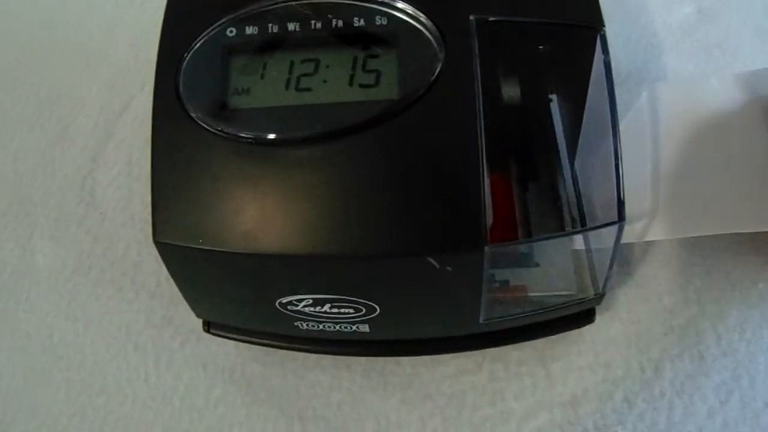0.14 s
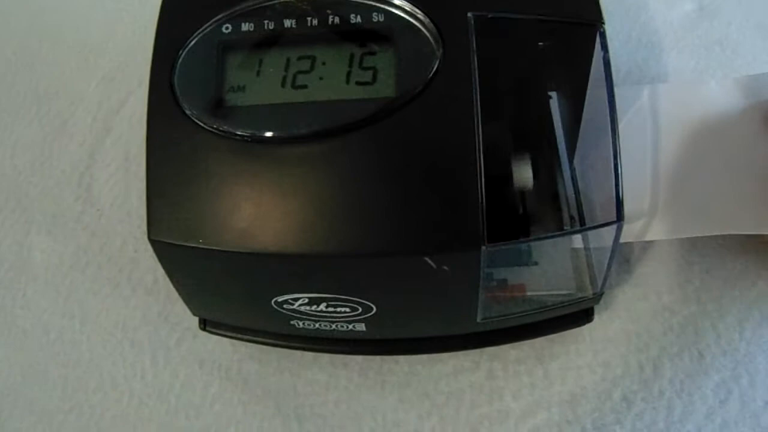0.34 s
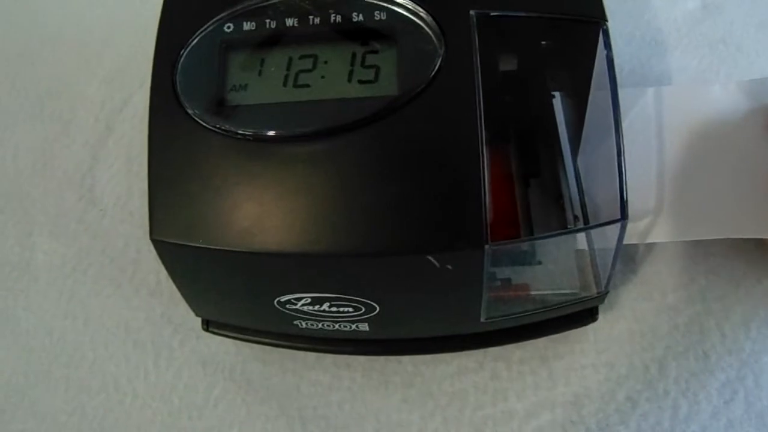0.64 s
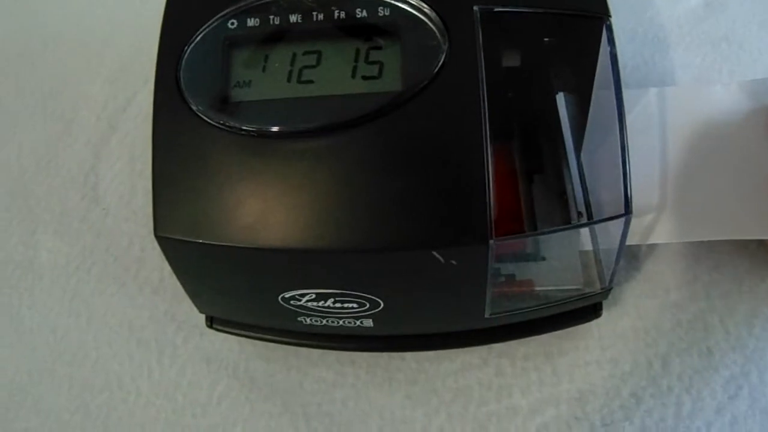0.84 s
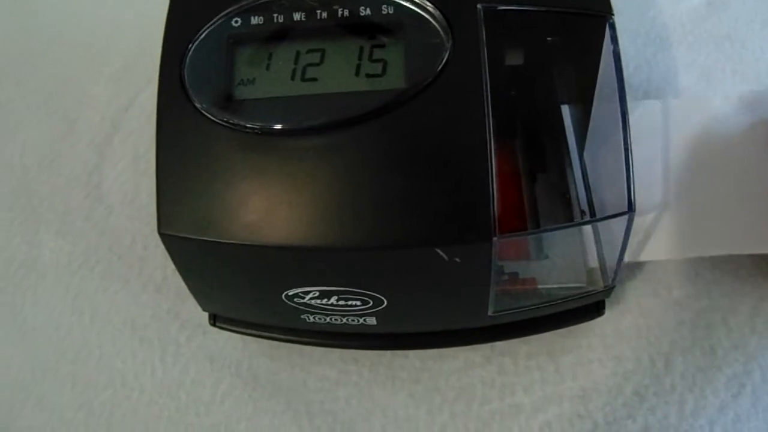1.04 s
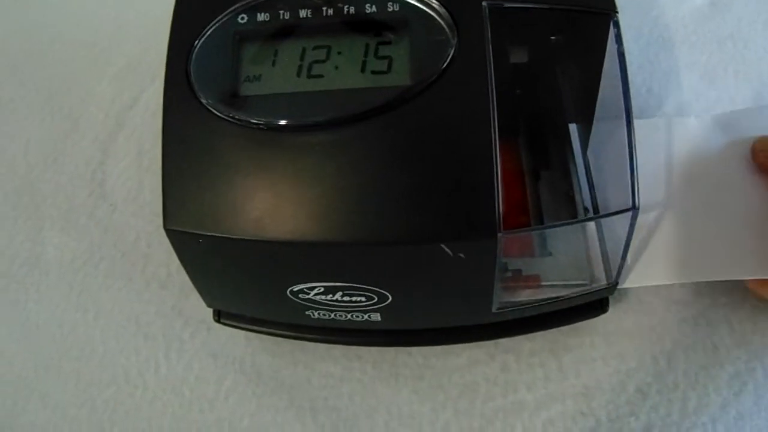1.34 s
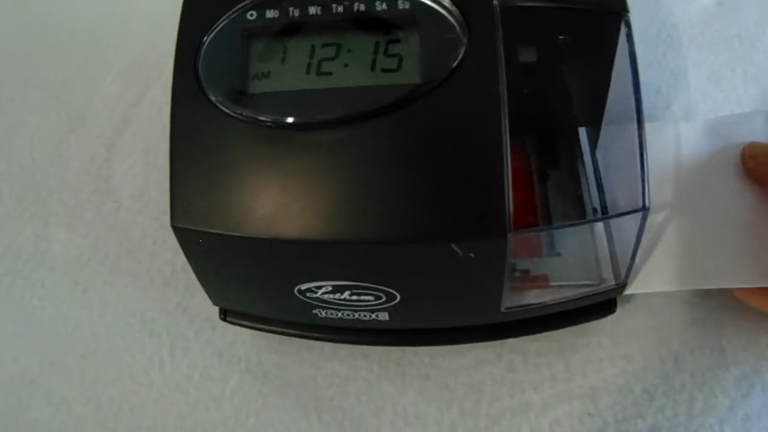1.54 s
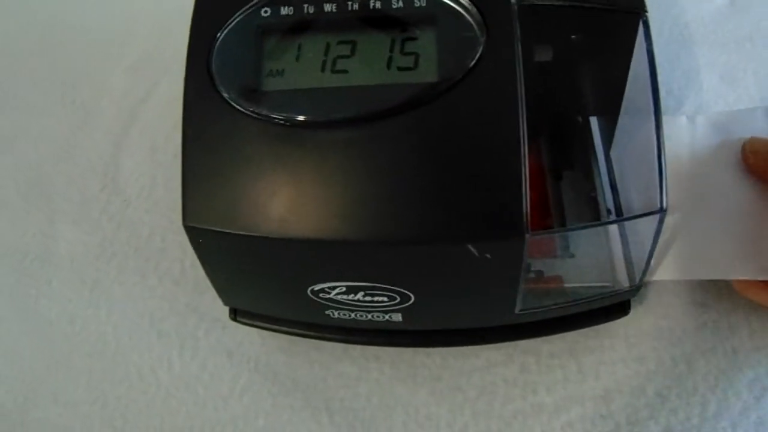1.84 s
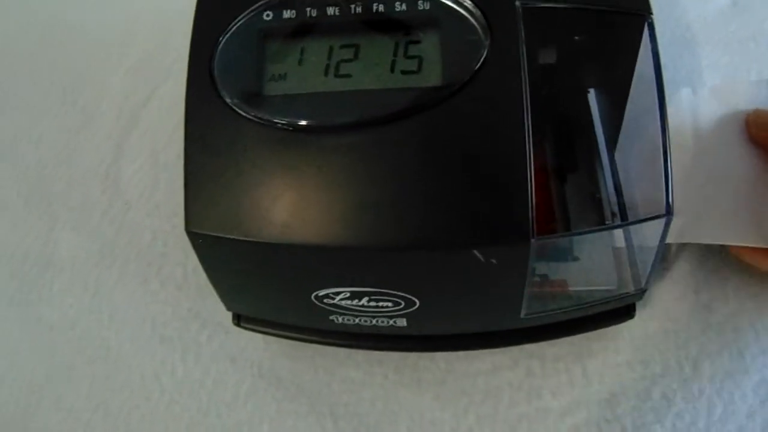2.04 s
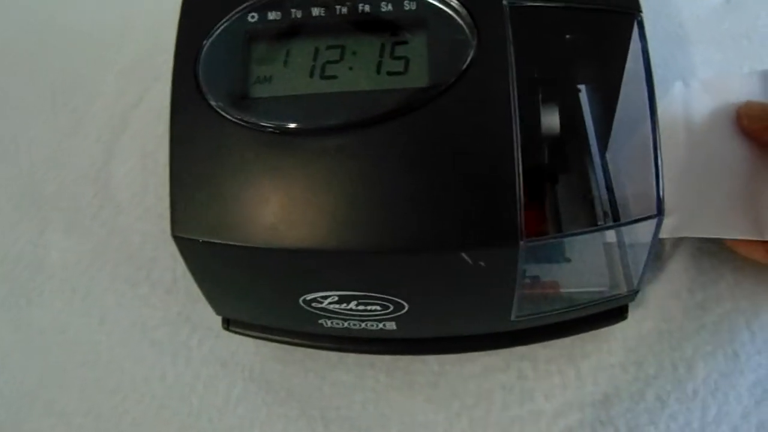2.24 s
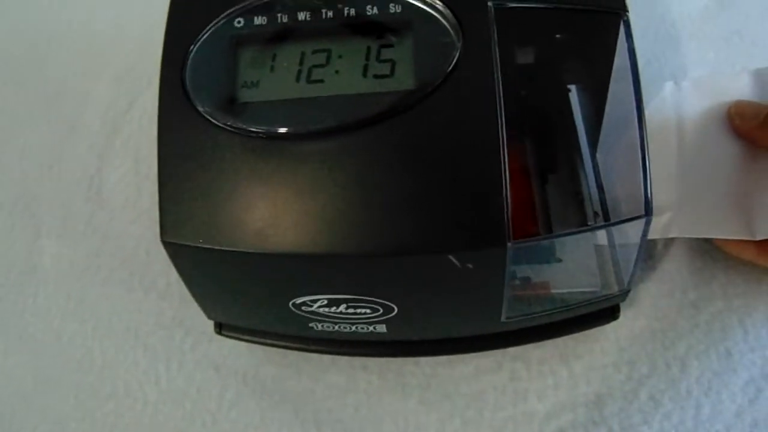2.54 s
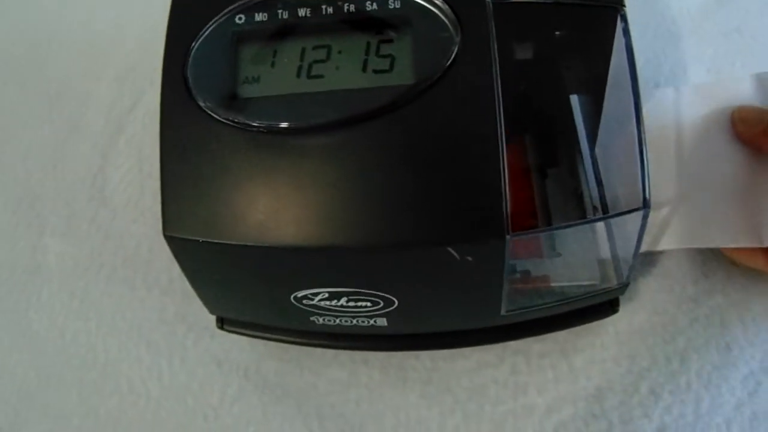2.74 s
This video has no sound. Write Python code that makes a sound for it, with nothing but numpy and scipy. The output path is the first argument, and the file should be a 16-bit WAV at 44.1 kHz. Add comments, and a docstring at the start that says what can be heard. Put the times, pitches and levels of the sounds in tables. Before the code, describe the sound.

Two loud stamps from a time clock, about two seconds apart: each a clunk, a brief printing rasp, a gear whine and sharp closing clicks. A card rubs softly in between, with faint chirping ticks. Close microphone, quiet room.

```python
"""In a small quiet room, an electric time clock stamps a card twice, close by.
Each time the motor spins up, the clamp clunks shut and judders, and the print needles rasp across
the card. Then the carriage that carries them whines back, clicks and knocks into its stop.
In between, the card slides in its slot, with soft chirping ticks."""
import sys
import numpy as np
from scipy import signal
from scipy.fft import rfft, irfft, next_fast_len
from scipy.io import wavfile
from scipy.ndimage import uniform_filter1d, minimum_filter1d, map_coordinates

SR = 44100
rng = np.random.default_rng(int(sys.argv[2]) if len(sys.argv) > 2 else 0)


def put_to_file(sound):
    """Save the sound as 16-bit audio at rate SR, in the file named by the first command-line argument."""
    columns = np.atleast_2d(sound).T  # one column per channel
    safe = np.clip(columns, -1, 1)
    whole_steps = np.round(safe * 32767)
    wavfile.write(sys.argv[1], SR, whole_steps.astype(np.int16))


N = 127890

# Knocks of the moving parts: start_s, thud_db, clack_db, snap_db, cover_db, fade_s
# (a fade time is how long a sound takes to drop by 60 dB)
BLOWS = [(0.2369, -21, -17.5, -27, -21, 0.04), (0.4712, -34, -24.5, -28.5, -47, 0.04),
         (.541, -54, -46, -34.5, -51, 0.059), (.582, -42, -25, -27, -36, 0.054),
         (.589, -28.5, -37, -36, -31.5, 0.071), (0.621, -32.5, -34.5, -45, -25.5, 0.057),
         (2.2486, -25, -18, -28, -22, 0.031), (2.458, -33.5, -31, -36, -32, 0.09),
         (2.4877, -40.5, -29, -23.5, -37, 0.031), (2.599, -29.5, -26, -26, -50, 0.055),
         (2.609, -34.5, -36, -48, -37, 0.068), (2.6385, -31, -28.5, -41, -26, 0.025)]
# The low, middle and high parts of a knock: pitch_hz, level_db
THUD_TONE = [(30, -35), (100, -18), (200, -12), (350, -3.5), (600, 1.5), (950, -4.5), (1250, 0.5),
             (2000, -13), (5000, -78)]
CLACK_TONE = [(300, -14.5), (1000, 2), (1600, 1.5), (2400, 4.5), (4000, 1), (5500, -7.5), (9000, -52)]
SNAP_TONE = [(1500, -8), (4500, 5), (7500, 4.5), (10000, -2), (14000, -1.5)]
# Notes of the plastic case and its hollow cover: pitch_hz, level_db, fade_s
CASE_NOTES = [(307, -9.5, 0.098), (379, -5, 0.12), (894, -10, 0.11), (1194, -0.5, 0.077),
              (1710, -15, 0.033), (2490, -7, 0.061), (3382, -3, 0.052)]
COVER_NOTES = [(550, -6, .09), (652.6, -3, 0.085)]


def blows():
    """Each blow thuds, clacks and snaps, and sets the case and its cover ringing."""
    thud, clack, snap = noise(THUD_TONE), noise(CLACK_TONE), noise(SNAP_TONE)
    out, t = np.zeros(N), np.arange(SR // 4) / SR

    def notes(rows):
        return sum(note(t, hz, db + rng.normal(0, 1.5), fade_s) for hz, db, fade_s in rows)

    for start, thud_db, clack_db, snap_db, cover_db, fade_s in BLOWS:
        hit = amp(thud_db) * thud + amp(clack_db) * clack + amp(snap_db) * snap
        out += hit * gate(start, start + 0.0028, 0.00078, fade_s)
        ring = amp(thud_db - 1.5) * notes(CASE_NOTES) + amp(cover_db) * notes(COVER_NOTES)
        add_at(out, start, ring * rise(t, 0.0014))
    return out


# When the clamp shakes: start_s, end_s, level_db
JUDDERS = [(0.25, 0.274, -21), (2.258, 2.278, -23.5)]
# The tone of that shaking: pitch_hz, level_db
JUDDER_TONE = [(40, -49), (170, -7.5), (340, -1), (560, 0), (800, -1.5), (1600, -2.5), (2340, -9),
               (4760, -11.5), (5250, -19.5), (14000, -32)]


def clamp_judder(rate_hz=480):
    """The clamp makes quick, uneven knocks as it presses on the card."""
    count = np.cumsum(rate_hz * (1 + 0.43 * wobble(400))) / SR
    knocks = np.diff(np.floor(count), prepend=0) * np.tanh(2 * wobble(900))
    rattle = unit(knocks) + 1.03 * rng.standard_normal(N)
    loudness = sum(amp(db) * gate(start, end, 0.00068, 0.047) for start, end, db in JUDDERS)
    return loudness * unit(filtered(rattle, tone_curve(JUDDER_TONE)))


# Bursts of printing: start_s, end_s, rasp_db, ring_hz, ring_db, buzz1_db, buzz2_db, buzz3_db
PRINT_BURSTS = [(0.283, 0.291, -24, 11300, -25, -40, -23, -29),
                (0.287, 0.297, -15.5, 9170, -21, -34, -20.5, -39),
                (0.298, 0.3095, -19, 9200, -21, -31, -24, -31),
                (.311, .322, -21, 13000, -29, -24.5, -25, -33),
                (0.322, 0.336, -23.5, 7500, -31, -38, -33, -25.5),
                (0.3415, 0.357, -20.5, 13730, -21, -35, -36, -25.5),
                (0.36, 0.363, -17, 14100, -22, -31, -50, -32),
                (2.2948, 2.3026, -23, 10950, -22, -33, -42, -42),
                (2.304, 2.325, -20, 9700, -28, -24.5, -29, -36),
                (2.325, 2.339, -20.5, 13900, -28, -24.5, -29, -22),
                (2.3445, 2.347, -15.5, 13850, -34, -19, -19, -29),
                (2.356, 2.37, -23.5, 13900, -26, -26, -37, -20),
                (2.368, 2.377, -22.5, 7150, -25.5, -25, -36, -22)]
# The tone of a needle's crack: pitch_hz, level_db
NEEDLE_TONE = [(40, -50), (160, -27), (357, -11), (650, -18.5), (892, -11), (1120, 1.5), (1400, -14.5),
               (2130, -9), (2800, -8), (3600, -15), (4420, -8.5), (8390, -14), (9190, -4.5), (14200, -14)]
# Ringing of the steel print head: pitch_hz, width_hz, level_db
HEAD_RINGS = [(9320, 90, -2), (13000, 250, 1.5), (13500, 210, 2), (5800, 47, 5.5), (7310, 400, 1.5)]


def needles():
    """Needles strike in step with the gears: they crack, buzz and ring at a new pitch in each burst."""
    phase = gear_phase(flutter=0.008)
    count = phase / (2 * np.pi)  # one strike per gear tooth
    force = amp(2.5 * rng.standard_normal(N))[count.astype(int)]
    since_strike_s = (count % 1) / (np.gradient(count) * SR)
    strikes = force * fade(since_strike_s, 0.003)
    gates = np.array([gate(start, end, 0.00039, 0.032) for start, end, *_ in PRINT_BURSTS])
    _, _, rasp_db, ring_hz, ring_db, *buzz_db = np.transpose(PRINT_BURSTS)

    def struck(response):
        return unit(filtered(strikes * rng.standard_normal(N), response))

    def loudness(db):
        return np.max(gates * amp(db)[:, None], axis=0)

    cracks = struck(tone_curve(NEEDLE_TONE)) + amp(-4) * struck(resonances(HEAD_RINGS))
    ring = sum(burst * amp(db) * struck(resonances([(hz, 200, 0)]))
               for burst, hz, db in zip(gates, ring_hz, ring_db))
    buzz = sum(loudness(db) * amp(1.6 * wobble(260)) * np.sin(k * phase + 0.42 * wobble(280))
               for k, db in enumerate(buzz_db, 1))
    return loudness(rasp_db) * cracks + ring + buzz


# How fast the gear teeth meet, one list per stamp: time_s, pitch_hz
GEAR_PITCH = [
    [(.2, 1189), (.27, 1205), (.29, 1064), (.312, 1061), (.326, 1119), (.352, 1024), (.374, 956.2),
     (.42, 970.4), (.46, 1007), (.476, 1185), (.495, 1149), (.52, 1185), (.55, 1195), (.59, 1176)],
    [(2.21, 1177), (2.28, 1204), (2.305, 1150), (2.33, 1091), (2.345, 1099), (2.374, 1079), (2.387, 1159),
     (2.42, 1135), (2.455, 1152), (2.5, 1188), (2.517, 1147), (2.546, 1212), (2.6, 1171)],
]


def gear_phase(flutter):
    """The gears go through one cycle per tooth, a bit unsteadily, and slow down under load."""
    times, pitches = np.transpose(np.vstack(GEAR_PITCH))
    return phase_of(np.interp(clock(), times, pitches) * (1 + flutter * wobble(170)))


# When the motor runs: start_s, clamp_shut_s, stop_s, level_db
MOTOR_RUNS = [(0.193, 0.222, 0.597, -0.5), (2.211, 2.27, 2.612, -0.5)]
# The tone of the rattling gears: pitch_hz, level_db
GEAR_TONE = [(35, -47), (149, -23), (340, -1.5), (790, -5), (1190, -5), (2500, -5.5), (3400, -12),
             (4450, -16.5), (4790, -10), (5200, -17.5), (14000, -27.5)]
# Whine at 1 to 4 times the gear pitch: start_s, end_s, tone1_db, tone2_db, tone3_db, tone4_db
WHINES = [(0.268, 0.275, -33, -28, -48, -22), (0.356, 0.378, -34, -36, -33, -55),
          (0.382, 0.416, -42, -50, -36, -57), (0.425, 0.443, -35.5, -55, -55, -56),
          (0.462, 0.46, -42, -52, -55, -29), (0.478, 0.587, -41, -36, -58, -39.5),
          (2.384, 2.423, -47, -29.5, -53, -55), (2.426, 2.437, -37, -33, -59, -41),
          (2.502, 2.521, -33, -30, -44, -39), (2.523, 2.597, -38.5, -36.5, -47, -47.5)]


def motor():
    """The gears rattle, softly while spinning up, and their whine changes with the load."""
    phase = gear_phase(flutter=0.005)
    rattle = amp(-36 + 1.43 * wobble(130)) * noise(GEAR_TONE)
    out = np.zeros(N)
    for start, shut, stop, db in MOTOR_RUNS:
        spin_up = amp(-5.5) * gate(start, shut, 0.0075, 0.02)
        running = gate(shut, stop, 0.0026, fade_s=0.19)
        out += amp(db) * (spin_up + running) * rattle
    for k, levels in enumerate(np.transpose(WHINES)[2:], 1):
        loudness = sum(amp(db) * gate(start, end, 0.0006, 0.021)
                       for (start, end, *_), db in zip(WHINES, levels))
        flicker = amp((1.3 + 0.55 * k) * wobble(110))
        out += loudness * flicker * np.sin(k * phase + 0.14 * k * wobble(300))
    return out


# When the carriage crosses the card: start_s, end_s
CROSSINGS = [(.3, 0.37), (2.31, 2.4)]


def carriage(pitch_hz=106, drift_hz=6.5):
    """The clock's body hums low while the carriage is driven across."""
    hum = np.sin(phase_of(pitch_hz + drift_hz * wobble(24.9)))
    return amp(-50) * hum * sum(gate(start, end, 0.015, 0.22) for start, end in CROSSINGS)


# Long-lasting notes of the whole housing: pitch_hz, width_hz, level_db
HOUSING_RINGS = [(1202, 33, -5.5), (384, 19.5, -5.5), (495, 28, -21)]


def housing(shaking):
    """The housing rings on when the parts inside shake it."""
    return filtered(shaking, resonances(HOUSING_RINGS))


# Soft chirping ticks: start_s, level_db
CHIRPS = [(.019, -43), (0.05, -42.5), (.092, -43), (.149, -38), (0.18, -37.5), (1.493, -42), (1.53, -44),
          (1.564, -45), (1.631, -45), (1.667, -44.5), (1.727, -40), (1.765, -39.5), (1.792, -40),
          (1.832, -39), (1.859, -39.5), (1.892, -39.5), (1.930, -38.5), (1.962, -41.5), (1.991, -40.5),
          (2.027, -40.5), (2.062, -38.5)]
# The ring under each tick: pitch_hz, level_db, fade_s
CHIRP_NOTES = [(793, -11.5, 0.11), (997, -2, 0.036), (1249, -5, 0.036)]


def chirps(from_hz=475, to_hz=896, glide_s=0.00785):
    """Each faint tick is a short rising tone over a brief ring."""
    out, t = np.zeros(N), np.arange(SR // 16) / SR
    glide_hz = from_hz + (to_hz - from_hz) * rise(t, glide_s)
    for start, db in CHIRPS:
        pitch_hz = glide_hz * (1 + 0.022 * rng.standard_normal())
        tone = np.sin(phase_of(pitch_hz)) * fade(t, 0.043)
        ring = sum(note(t, *row) for row in CHIRP_NOTES)
        add_at(out, start, amp(db) * (tone + ring) * rise(t, 0.0012))
    return out


# How loudly the card rubs in its slot: time_s, level_db
RUB_LEVELS = [(0, -50), (.1, -53.5), (.16, -58), (.8, -69), (1.0, -60), (1.18, -55.5), (1.25, -50),
              (1.37, -50), (1.45, -53.5), (1.87, -63), (1.92, -54), (2.0, -57.5), (2.13, -49), (2.181, -65),
              (2.68, -56), (2.72, -52), (2.9, -56)]
# The tone of that rubbing: pitch_hz, level_db
RUB_TONE = [(300, -8), (1500, 2), (2200, -3), (2800, 6), (4000, -2.5), (5800, 2), (8500, -1), (11000, -1.5),
            (14000, -1.5)]
# The card's edge sings: start_s, length_s, pitch_hz, width_hz, level_db
SCRAPES = [(0.928, 0.25, 6150, 600, -56.5), (0.985, 0.23, 2750, 120, -58), (1.115, 0.054, 2740, 70, -54.5),
           (2.68, 0.091, 5400, 600, -52.5)]
# The card touches the slot: start_s, level_db
TAPS = [(0.092, -44.5), (1.23, -51), (2.122, -42), (2.144, -44)]


def card():
    """The paper sticks and slips as it slides, sings at its edge and taps the slot."""
    slips_db = 1.5 * wobble(240)
    out = amp(np.interp(clock(), *np.transpose(RUB_LEVELS)) + slips_db / 2) * noise(RUB_TONE)
    for start, length, hz, width, db in SCRAPES:
        band = resonances([(hz, 1.5 * width, 0)])  # squaring it below narrows it again
        edge = unit(filtered(rng.standard_normal(N), lambda f: band(f) ** 2))
        swell = np.sin(np.pi * np.clip((clock() - start) / length, 0, 1))
        out += amp(db + slips_db) * edge * swell
    taps = sum(amp(db) * gate(start, start, 0.00065, 0.055) for start, db in TAPS)
    return out + taps * noise(CLACK_TONE)


def card_bump(start_s=1.148, pitch_hz=252):
    """The card is pushed against its stop with one soft, low knock."""
    tone = np.sin(2 * np.pi * pitch_hz * (clock() - start_s))
    return amp(-46.5) * gate(start_s, start_s + 0.008, 0.004, 0.09) * tone


# How long the room echoes: pitch_hz, fade_s
ECHO_FADES = [(150, 0.57), (500, 0.45), (1400, 0.37), (4000, 0.28), (12000, 0.31)]


def room_echo(x):
    """The room adds a short echo in which low notes last longest."""
    hz, t, spectrum = signal.stft(rng.standard_normal(SR // 2), SR, nperseg=256)
    _, tail = signal.istft(spectrum * fade(t, along(ECHO_FADES, hz)[:, None]), SR, nperseg=256)
    tail *= rise(np.arange(len(tail)) / SR, 0.0022)
    return signal.fftconvolve(x, tail / np.linalg.norm(tail))[:N]


# The tone of the room's air: pitch_hz, level_db
AIR_TONE = [(15, -39), (25, -4), (91, -7.5), (160, -3.5), (286, -1.5), (761, -9), (868, -5.5), (1440, -15),
            (2570, -14.5), (3630, -19.5), (14000, -24.5)]


def room_air():
    """The air makes a faint, steady, low hush."""
    return amp(-53) * noise(AIR_TONE)


def amp(db):
    """Turn decibels into a number to multiply by."""
    return 10 ** (np.asarray(db) / 20)


def unit(x):
    """Scale a sound to an average strength (rms) of 1."""
    return x / np.sqrt(np.mean(x ** 2) + 1e-20)


def clock():
    """The time of each sample, in seconds."""
    return np.arange(N) / SR


def phase_of(hz):
    """The growing angle of a wave whose pitch changes."""
    return 2 * np.pi * np.cumsum(hz) / SR


def rise(t, rise_s):
    """Climb smoothly from 0 towards 1."""
    return 1 - np.exp(-t / rise_s)


def fade(t, fade_s):
    """Drop by 60 dB every fade_s seconds."""
    return np.exp(-np.log(1000) * t / fade_s)


def gate(start, end, rise_s, fade_s):
    """Rise from start, hold until end, then fade."""
    t = clock()
    return rise(np.maximum(t - start, 0), rise_s) * fade(np.maximum(t - end, 0), fade_s)


def note(t, hz, db, fade_s):
    """One pure tone dying away."""
    return amp(db) * fade(t, fade_s) * np.sin(2 * np.pi * (hz * t + rng.random()))


def add_at(out, start_s, sound):
    """Mix a short sound into out."""
    span = out[round(start_s * SR):][:len(sound)]
    span += sound[:len(span)]


def wobble(rate):
    """A smooth random curve through rate points a second."""
    return map_coordinates(rng.standard_normal(int(N * rate / SR) + 4), [clock() * rate])


def along(points, hz):
    """Read between (pitch_hz, value) points on a log pitch scale."""
    pitches, values = np.transpose(points)
    return np.interp(np.log(hz + 1), np.log(pitches + 1), values)


def tone_curve(points):
    """A filter shape drawn through (pitch_hz, level_db) points."""
    return lambda hz: amp(along(points, hz))


def resonances(rows):
    """A filter shape that rings at each (pitch_hz, width_hz, level_db)."""
    return lambda f: sum(amp(db) * 1j * f * width / (hz * hz - f * f + 1j * f * width)
                         for hz, width, db in rows)


def filtered(x, response):
    """Turn each frequency up or down by a filter shape."""
    size = next_fast_len(N + SR // 2)
    return irfft(rfft(x, size) * response(np.fft.rfftfreq(size, 1 / SR)), size)[:N]


def noise(tone):
    """Noise of strength 1 with the given tone."""
    return unit(filtered(rng.standard_normal(N), tone_curve(tone)))


def scene():
    """Mix the time clock and the card with the room's echo and air."""
    knocks = blows() + clamp_judder()
    printing = needles()
    gears = motor() + carriage()
    soft = chirps() + card() + card_bump()
    knocks += housing(knocks + amp(-2) * printing + gears)
    echo = room_echo(amp(-8) * knocks + amp(-9.5) * printing + amp(-13.5) * gears + amp(-12) * soft)
    return (knocks + printing + gears + soft + echo + room_air())[None]


def record(dry, limit_db=-5.5, hold_s=0.0032, top_hz=14260):
    """A fast limiter turns down the loudest peaks, and the highest treble is cut off."""
    window = int(hold_s * SR)
    needed = np.minimum(1, amp(limit_db) / (np.abs(dry[0]) + 1e-9))
    gain = uniform_filter1d(minimum_filter1d(needed, window), window)
    return filtered(dry[0] * gain, lambda hz: 1 / np.sqrt(1 + (hz / top_hz) ** 400))[None]


dry = scene()
out = record(dry)
put_to_file(out)
```